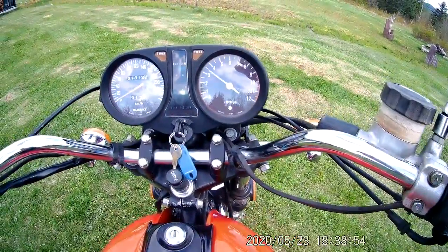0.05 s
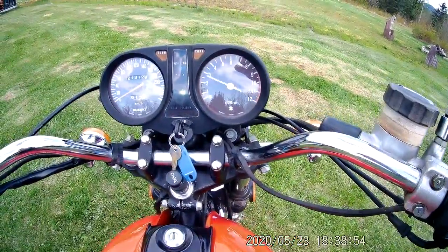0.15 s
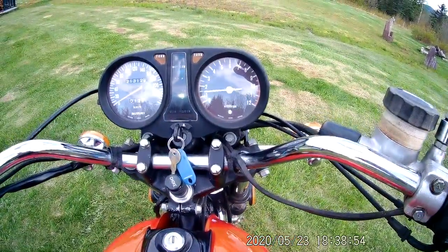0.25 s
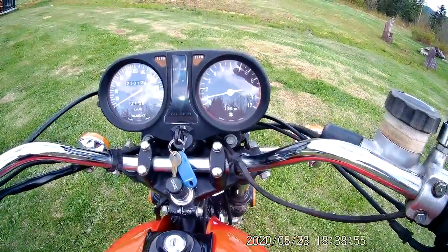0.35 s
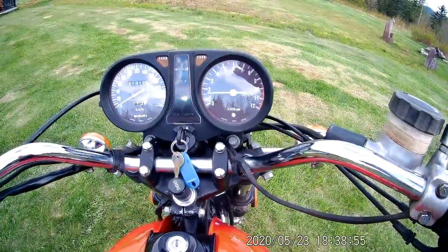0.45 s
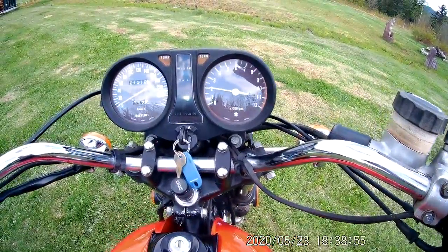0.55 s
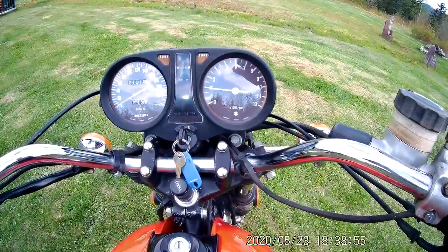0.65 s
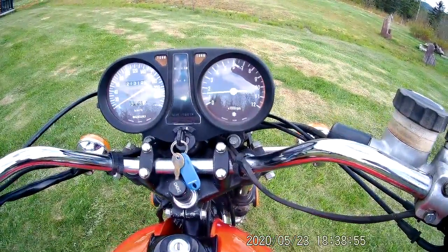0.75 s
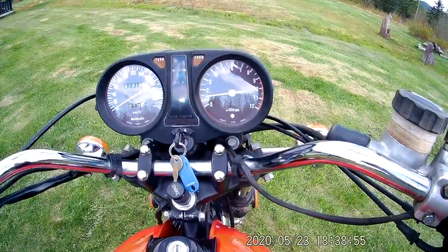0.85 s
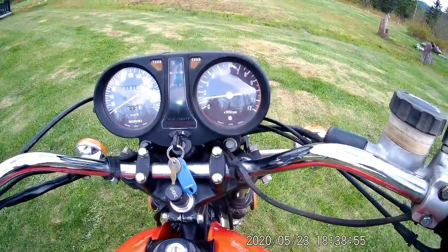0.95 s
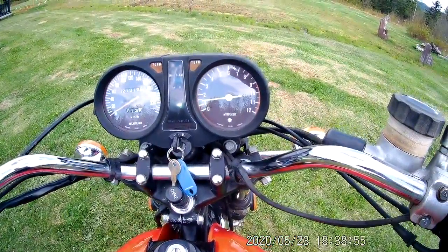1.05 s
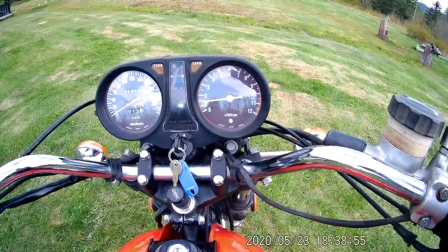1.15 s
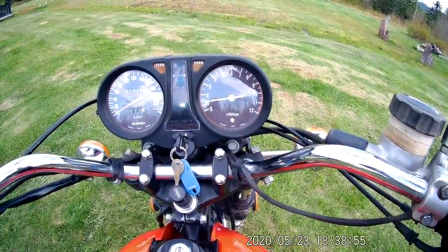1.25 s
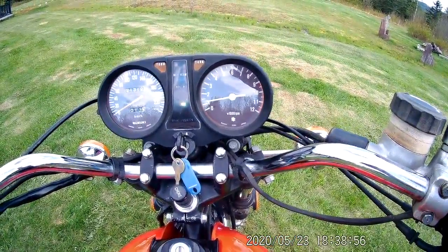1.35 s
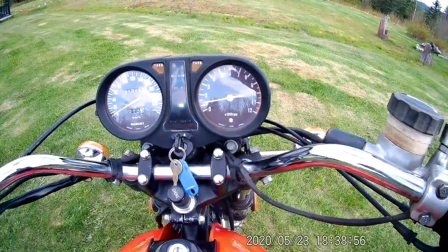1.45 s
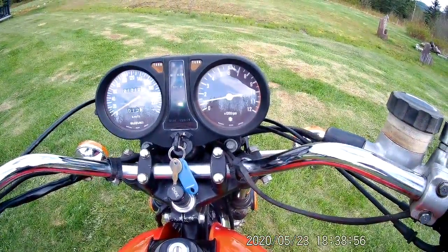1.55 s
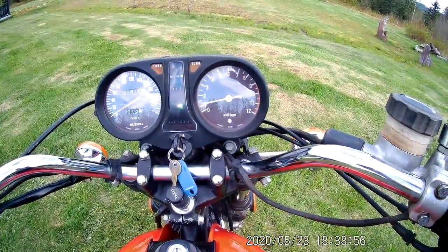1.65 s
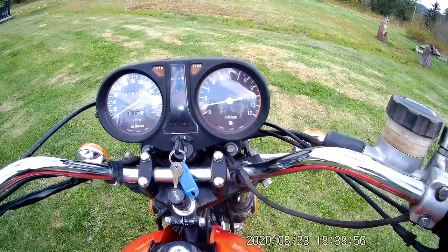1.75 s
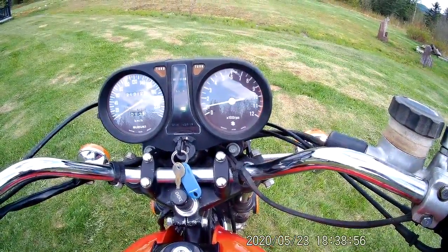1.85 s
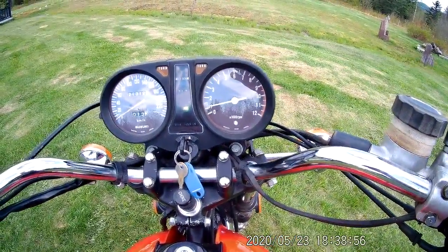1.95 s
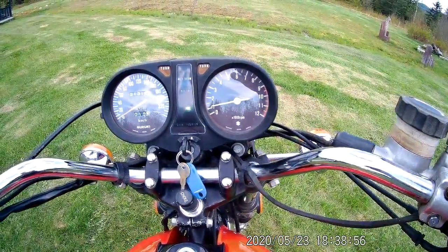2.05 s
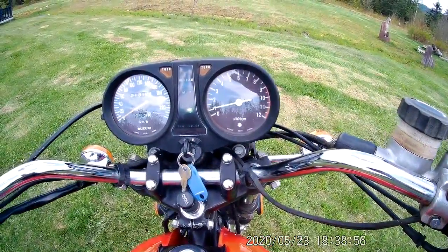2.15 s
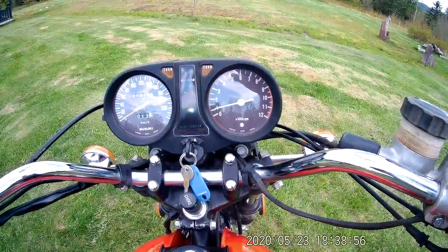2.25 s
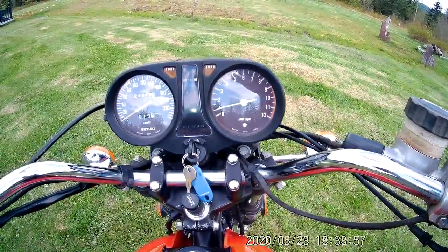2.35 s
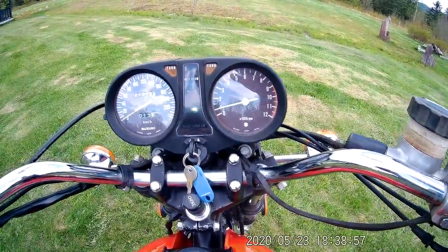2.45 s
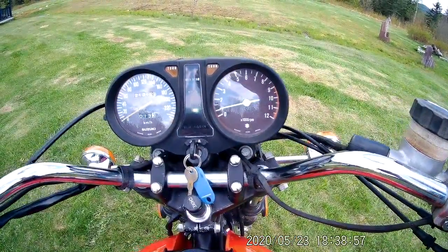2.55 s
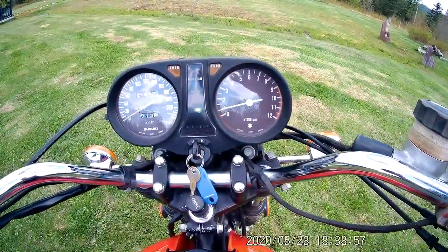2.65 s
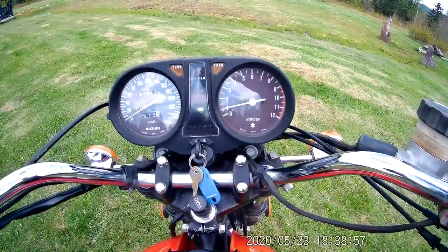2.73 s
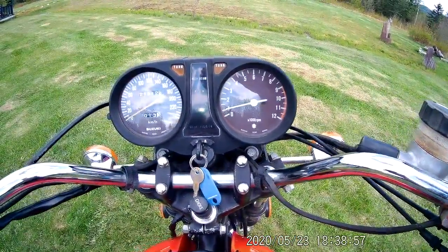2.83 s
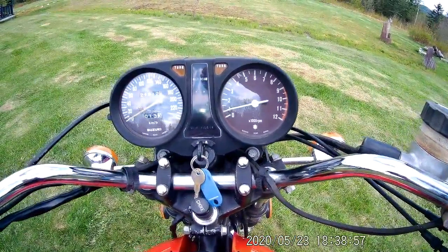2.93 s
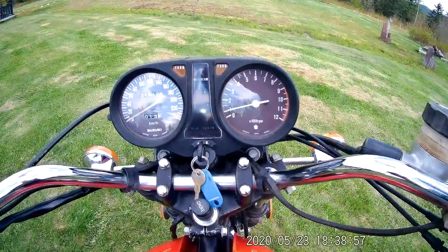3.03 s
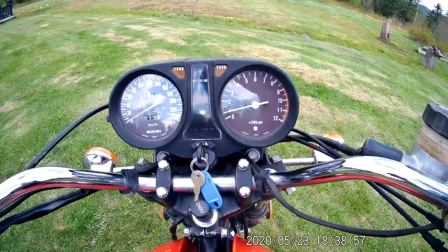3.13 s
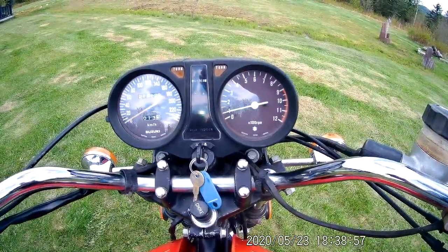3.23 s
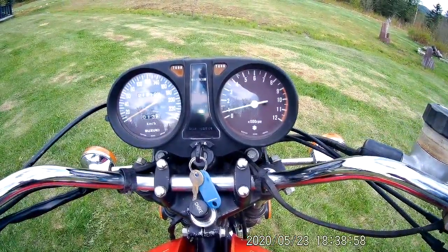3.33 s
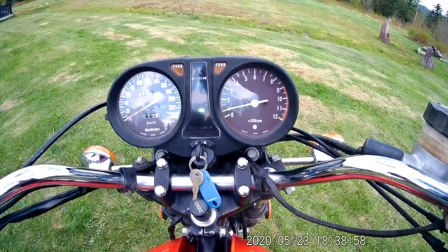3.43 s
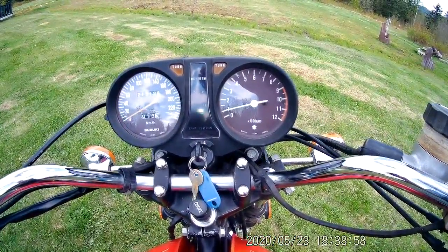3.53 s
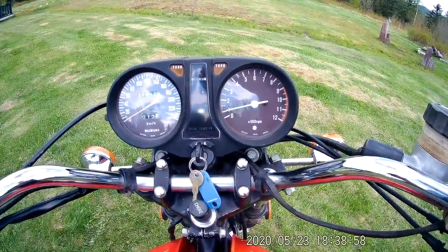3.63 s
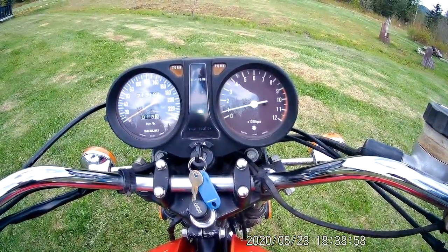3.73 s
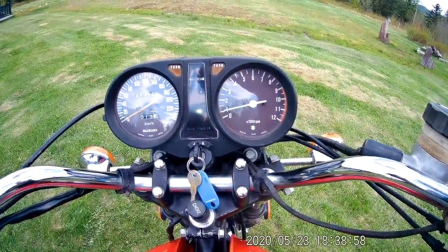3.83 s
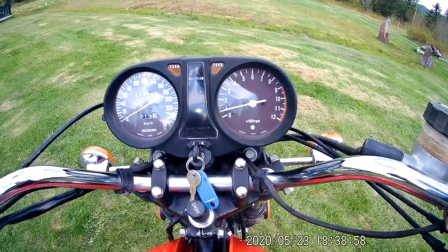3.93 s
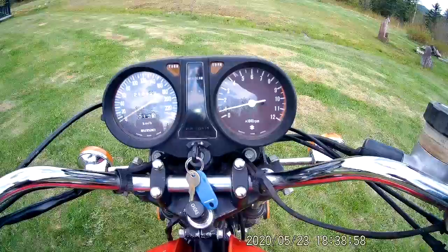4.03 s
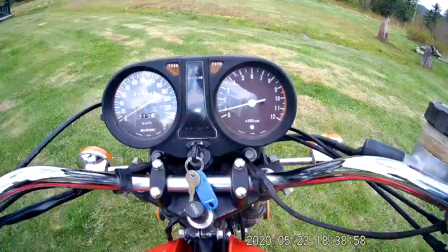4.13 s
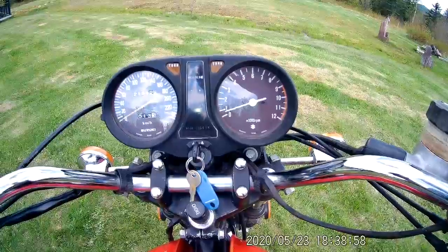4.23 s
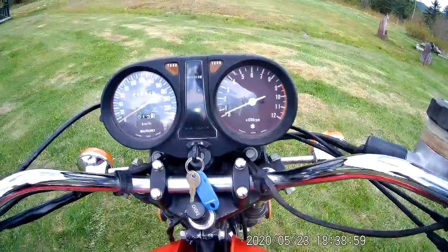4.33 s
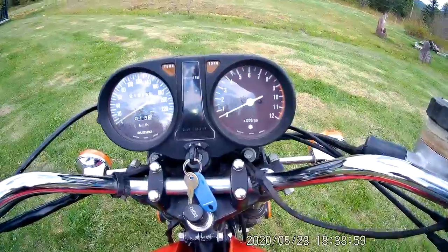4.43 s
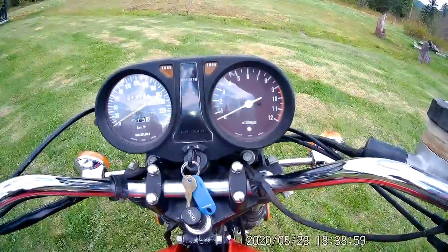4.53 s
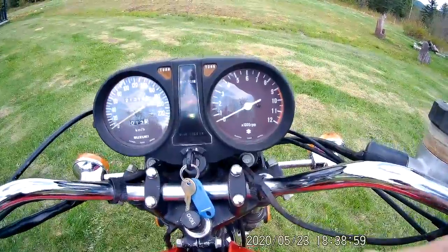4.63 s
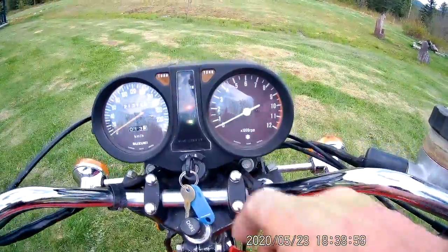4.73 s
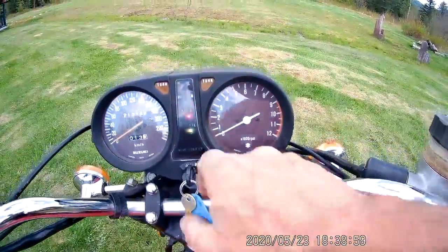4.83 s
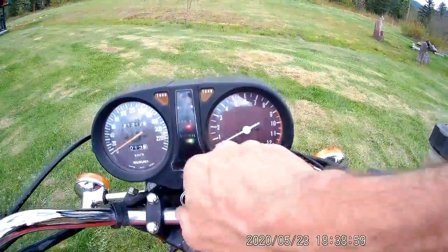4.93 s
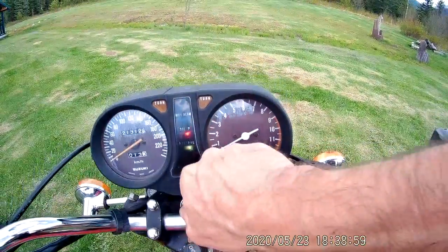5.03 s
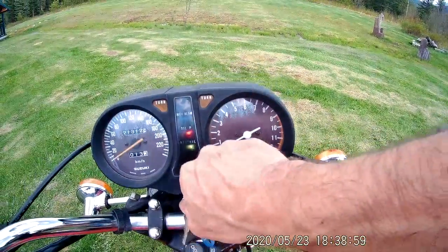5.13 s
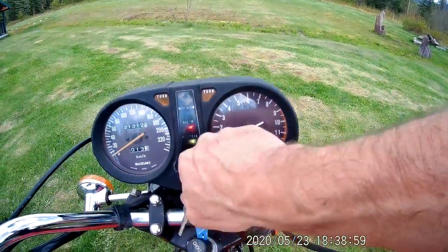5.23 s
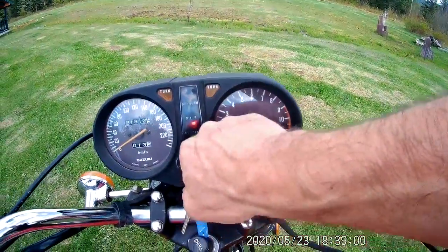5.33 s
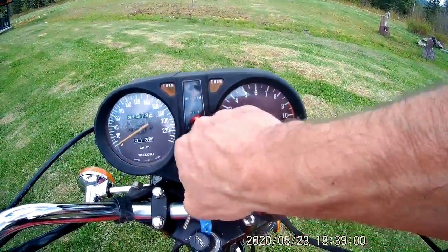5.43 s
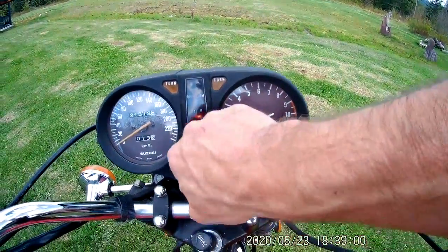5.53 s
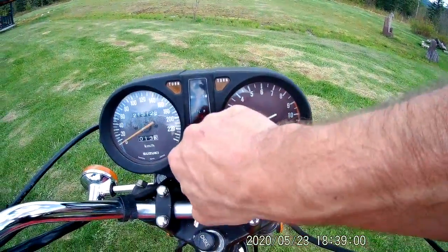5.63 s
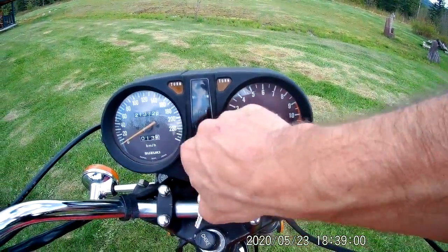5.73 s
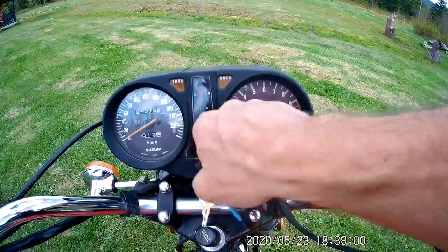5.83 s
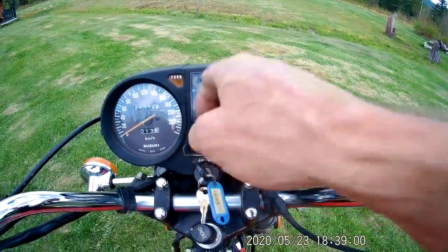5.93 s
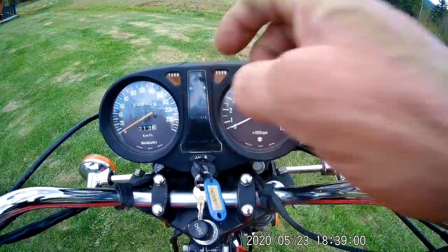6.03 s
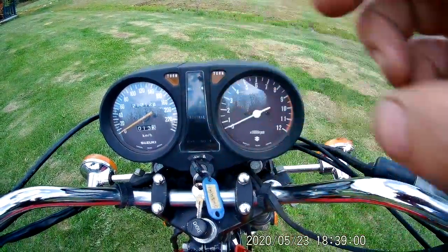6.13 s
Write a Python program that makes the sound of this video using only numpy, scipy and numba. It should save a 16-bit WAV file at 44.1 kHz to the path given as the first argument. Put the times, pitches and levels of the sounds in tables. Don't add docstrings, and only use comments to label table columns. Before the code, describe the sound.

A motorcycle engine falls from a short rev to a rattling idle, is switched off with a snap and clunks, then a key clicks and jingles.

```python
import sys
import numpy as np
from scipy import signal
from scipy.fft import rfft, irfft, next_fast_len
from scipy.io import wavfile
from scipy.ndimage import uniform_filter1d
from numba import njit

SR = 44100
rng = np.random.default_rng(int(sys.argv[2]) if len(sys.argv) > 2 else 0)


def digitize_waveform(pressure):
    field = np.atleast_2d(pressure).T
    bounded = np.clip(field, -1, 1)
    quanta = np.round(bounded * 32767).astype(np.int16)
    wavfile.write(sys.argv[1], SR, quanta)


def voltage_ratio(level):
    return 10 ** (np.asarray(level, float) / 20)


N = 272582
TIME = np.arange(N) / SR
CUT_S = 4.06
IDLE_HZ, BLIP_HZ = 43.8, 110
TEETH_PER_FIRING = 7.5


def unit(x, until=1.8):
    return x / np.sqrt(np.mean(x[:int(until * SR)] ** 2))


def steady(x, span_s):
    power = uniform_filter1d(x ** 2, int(span_s * SR))
    return x / np.sqrt(power + 1e-4 * np.mean(x ** 2))


@njit
def svf(x, hz, width):
    y, b, l = np.empty(len(x)), 0., 0.
    g, k = np.tan(np.pi * hz / SR), width / hz
    for i in range(len(x)):
        v = (b + g * (x[i] + 1e-18 - l)) / (1 + g * (g + k))
        b, l, y[i] = 2 * v - b, l + 2 * g * v, k * v
    return y


def ring(x, modes):
    out = 0
    for k, (hz, width, db) in enumerate(modes):
        out = out + (-1) ** k * voltage_ratio(db) * svf(x, float(hz), float(width))
    return out


def colour(x, points):
    hz, db = np.transpose(points)
    size = next_fast_len(N)
    bins = np.log(np.arange(size // 2 + 1) * SR / size + 1)
    gain = voltage_ratio(np.interp(bins, np.log(hz), db, left=-90, right=-90))
    return irfft(rfft(x, size) * gain, size)[:N]


def answer(hz, points):
    points_hz, db = np.transpose(points)
    return np.interp(np.log(hz), np.log(points_hz), db)


def walk(rate):
    k = int(SR / rate)
    held = np.repeat(rng.standard_normal(N // k + 1), k)
    return 1.31 * uniform_filter1d(uniform_filter1d(held, k), k)[:N]


def burst(s, db, t60):
    t = TIME - s
    decay = np.exp(-np.log(1000) * np.maximum(t, 0) / max(t60, .003))
    return voltage_ratio(db) * (t >= 0) * decay * rng.standard_normal(N)


def bell(s, hz, db, t60):
    t = np.maximum(TIME - s, 0)
    return voltage_ratio(db) * np.exp(-np.log(1000) * t / t60) * np.sin(2 * np.pi * hz * t)


def bump(at_s, width_s):
    return np.exp(-((TIME - at_s) / width_s) ** 2)


# loss in dB per s, loss in dB per s squared.
LAYER_LOSS = dict(tone=(40, 40), octave=(37, 40), uneven=(2.3, 104), chain=(73, 200), clatter=(4, 71.5),
              air=(31, 0), boom=(0, -26), jangle=(5, 0))


def fade(layer):
    since = np.clip(TIME - CUT_S, 0, 1)
    linear, square = LAYER_LOSS[layer]
    return -linear * since - square * since ** 2


# time in seconds, firing rate in Hz.
FIRING_RATE = [(0, 109.9), (.15, 96), (.3, 84.3), (.45, 77.5), (.6, 72.4), (.75, 68), (.9, 62.3),
               (1.05, 58.3), (1.2, 55.8), (1.35, 52.8), (1.65, 49.2), (1.9, 48.5), (2.25, 44.9),
               (2.55, 44.5), (2.7, 45.1), (3.0, 44.4), (3.17, 42.2), (3.45, 44.5)]


def crank():
    hz = np.interp(TIME, *np.transpose(FIRING_RATE + [(3.8, IDLE_HZ)]))
    hz = uniform_filter1d(hz, size=4000, mode="nearest")
    rev = np.clip((hz - IDLE_HZ) / (BLIP_HZ - IDLE_HZ), 0, 1)
    sag_hz_per_s = 32
    return np.maximum(hz - sag_hz_per_s * np.maximum(TIME - CUT_S, 0), 10), rev


# frequency in Hz, level in dB per Hz.
FLOOR_SPECTRUM = [(12, -35.5), (20, 1.5), (122, -3.5), (479, -14), (599, -15.5), (708, -17.5), (1080, -21),
                  (1240, -23), (1830, -24.5), (3100, -28.5), (6950, -30), (8450, -29.5), (10300, -30),
                  (12000, -22.5), (13200, -26.5), (15600, -28)]


def camera(rev):
    hiss = unit(colour(rng.standard_normal(N), FLOOR_SPECTRUM)) * voltage_ratio(-62)
    whistle = voltage_ratio(-83 + 1.0 * walk(7.4)) * np.sin(2 * np.pi * 8613 * TIME)
    whistle = whistle + voltage_ratio(-85 + 2.5 * walk(9)) * np.sin(2 * np.pi * 12306 * TIME)
    hold_s, release_s = 4.585, 0.47
    lift_db = 10.5 * rev + 9.5 * np.clip(1 + (hold_s - TIME) / release_s, 0, 1)
    return (hiss + whistle) * voltage_ratio(lift_db)


# start in seconds, peak in dB, bright part relative to the peak in dB, ring in seconds.
LOCK_CLICKS = [(5.174, -52, -6, 0.024), (5.188, -54, -6, 0.022), (5.1965, -54, 2, 0.01),
               (5.204, -54, -5, .02), (5.22, -54, -12, .01), (5.260, -59, 1.5, 0.073),
               (5.540, -61, -8, 0.028), (5.547, -51, -11, 0.038), (5.589, -52, -12, 0.032),
               (5.594, -48, -9, .02), (5.597, -36, 0, 0.018), (5.605, -49, -7, 0.046),
               (5.614, -53, -18, 0.17), (5.636, -41.5, 1, 0.013), (5.660, -56, -13.5, .04),
               (5.732, -62.5, -0.5, 0.023), (5.858, -60, -9, .02), (5.9595, -48, -4, 0.012)]
# frequency in Hz, width in Hz, level in dB.
LOCK_MODES = [(313, 29, -5), (595, 73, -1.5), (1150, 160, 4), (1655, 300, 2), (1910, 190, 0),
              (2500, 250, -13)]
# frequency in Hz, width in Hz, level in dB.
PIN_MODES = [(3620, 540, 4), (4560, 1100, -1.5), (5870, 2150, -7), (7360, 1100, -2), (7930, 840, -2.5)]
# start in seconds, frequency in Hz, level in dB, ring in seconds.
KEY_PARTIALS = [(5.262, 8170, -54, 0.08), (5.27, 8170, -55, .07), (5.278, 8170, -54.5, 0.043),
                (5.277, 10100, -60, 0.11), (5.265, 12000, -59, .08), (5.268, 3770, -61, .03),
                (5.614, 8060, -43, 0.038), (5.636, 5700, -44, .012), (5.547, 640, -57, .04),
                (5.73, 7940, -72, .08)]
# start in seconds, frequency in Hz, level in dB, ring in seconds.
BARREL_PARTIALS = [(5.5985, 1109, -29, .035), (5.599, 630, -38, .05), (5.599, 323, -46, .05),
                   (5.5995, 1766, -35, .02), (5.6365, 1150, -41, .022), (5.549, 680, -54, .04),
                   (5.9595, 1600, -46, .018), (5.9595, 3530, -52, .012), (5.964, 1017, -58, .06),
                   (5.1965, 8300, -49, .008), (5.1965, 12800, -54, .006)]


def key():
    knock = sum(burst(s + 0.0007, db, t60) for s, db, _, t60 in LOCK_CLICKS)
    for s, db, _, _ in LOCK_CLICKS:
        knock[int((s + .0005) * SR)] += voltage_ratio(db + 15.5)
    tick = sum(burst(s, db + bright_db, 0.96 * t60) for s, db, bright_db, t60 in LOCK_CLICKS)
    jingle = sum(bell(*row) for row in KEY_PARTIALS + BARREL_PARTIALS)
    return voltage_ratio(10.5) * ring(knock, LOCK_MODES) + voltage_ratio(12.5) * ring(tick, PIN_MODES) + jingle


# frequency in Hz, width in Hz, level in dB.
CASING_MODES = [(224, 10, -22), (310.9, 14.4, -1), (377, 29, -10.5), (529.7, 46, -3.5), (620.3, 22.3, -8),
                (715.4, 24, -4), (919.3, 25.6, -10), (1024, 34, -3), (1151, 41.5, -8), (1262, 27, -1.5),
                (1504.5, 29.7, -3), (1697, 15.3, -3.5), (1808, 99, -21), (2122, 11, -8), (2484, 56, -24.5),
                (2592, 22, -22.5)]


def casing_ring(blows):
    return ring(blows, CASING_MODES)


# frequency in Hz, level in dB per Hz.
CASING_COLOUR = [(76, -36), (130, -10), (238, -6.5), (360, -2.5), (429, -9), (531, -8.5), (805, -5),
                 (1510, -6.5), (2000, -12), (3200, -48.5), (4160, -77.5), (7040, -120)]


def casing_colour(blows):
    return colour(blows, CASING_COLOUR)


# start in seconds, peak in dB, ring in seconds.
SWITCH_CLICK = [
    (4.0628, -18.5, 0.009),
]
# start in seconds, frequency in Hz, level in dB, ring in seconds.
SWITCH_PARTIALS = [(4.0627, 1550, -9, .012), (4.0627, 2900, -22, .005), (4.0627, 4200, -20, 0.006),
                   (4.0627, 9300, -14.5, 0.009), (4.0627, 13560, -18, .006), (4.0627, 11600, -19.5, 0.005),
                   (4.0627, 6400, -18, 0.005)]
# start in seconds, peak in dB, ring in seconds.
CRANK_CLUNKS = [
    (4.451, -27, 0.12),
    (4.496, -24, 0.17),
    (4.518, -29, 0.087),
    (4.542, -20.5, 0.16),
]
# start in seconds, frequency in Hz, level in dB, ring in seconds.
CLUNK_PARTIALS = [(4.542, 1513, -21, 0.095), (4.5415, 2490, -27, 0.062), (4.545, 1700, -38, 0.22),
                  (4.548, 501, -26.5, 0.1), (4.546, 940, -29, 0.12), (4.547, 382, -31.5, 0.18),
                  (4.55, 1513, -26, 0.075)]
# start in seconds, frequency in Hz, level in dB, ring in seconds.
GAS_BOOMS = [
    (4.15, 99.3, -13, .45),
    (4.17, 140, -23, .35),
    (4.341, 99.4, -22, .2),
    (4.35, 140, -29, .25),
]


def stop():
    snap = sum(burst(*row) for row in SWITCH_CLICK)
    blows = sum(burst(*row) for row in CRANK_CLUNKS)
    last_s, last_db, last_t60 = CRANK_CLUNKS[-1]
    crack = burst(last_s, last_db, 0.3 * last_t60)
    noise = rng.standard_normal(N)
    body = casing_ring(blows) / np.std(casing_ring(noise))
    body = body + voltage_ratio(1.0) * casing_colour(blows) / np.std(casing_colour(noise))
    partials = sum(bell(*row) for row in GAS_BOOMS + CLUNK_PARTIALS + SWITCH_PARTIALS)
    bright = partials + voltage_ratio(-2.5) * svf(svf(crack, 3700.0, 1600.0), 3700.0, 1600.0)
    away = svf(svf(burst(4.5, -23.0, 0.71), 140.0, 160.0), 142.0, 160.0)
    return voltage_ratio(-0.5) * svf(snap, 6300.0, 11000.) + voltage_ratio(-8.5) * body + bright + away


# start in seconds, peak in dB, frequency in Hz.
CRANK_KNOCKS = [(0.504, -13.5, 586), (0.627, -19, 622), (0.888, -12.5, 530), (0.953, -14, 589),
                (0.997, -26, 541), (1.042, -21, 546), (1.168, -9, 600), (1.238, -31, 595),
                (1.276, -19, 528), (1.316, -9, 544), (1.392, -12.5, 540), (1.511, -23, 606),
                (1.711, -11.5, 526), (1.751, -17.5, 614), (1.918, -9.5, 541), (1.961, -16, 608),
                (1.999, -20, 538), (2.081, -12, 552), (2.123, -9, 522), (2.258, -24.5, 554),
                (2.438, -10.5, 530), (2.484, -7.5, 540), (2.739, -28, 603), (2.93, -19, 604),
                (3.019, -13, 536), (3.1, -22.5, 633), (3.159, -6, 541), (3.207, -18, 526),
                (3.391, -12.5, 520), (3.705, -20, 533)]
# start in seconds, peak in dB, frequency in Hz.
COVER_PINGS = [(0.166, -17, 1500), (0.5467, -15, 1500), (0.6374, -15, 1520), (0.6719, -17.5, 1530),
               (0.6978, -16, 1390), (0.7557, -15, 1490), (0.8624, -14, 1520), (0.9702, -16, 1370),
               (1.0954, -18, 1710), (1.1368, -17, 1520), (1.257, -16, 1490), (1.4481, -17, 1510),
               (1.6297, -17, 1500), (1.6873, -13.5, 1530), (1.957, -17, 1510), (2.1236, -16, 1500),
               (2.2124, -15, 1510), (2.2772, -12, 1510), (2.3905, -16, 1500), (2.5456, -18, 1500),
               (2.6214, -19, 1420), (2.6589, -16.5, 1510), (2.7731, -14, 1530), (2.7965, -13, 1520),
               (3.0215, -15, 1500), (3.0814, -13.5, 1520), (3.2345, -19.5, 1530), (3.274, -15, 1510),
               (3.3662, -15, 1525), (3.4176, -16.5, 1510), (3.6875, -16.5, 1320), (3.7314, -16, 1500),
               (3.896, -15, 1530), (3.959, -14.5, 1480), (4.0302, -16, 1390), (4.0522, -14, 1504),
               (4.0786, -15.5, 1480), (4.1545, -20, 1510), (4.2128, -15.5, 1520), (4.2936, -20, 1640)]


def knocks():
    dull = sum(bell(s - .002, hz, db, .045) for s, db, hz in CRANK_KNOCKS)
    pings = sum(bell(s, hz, db, .05) for s, db, hz in COVER_PINGS)
    return voltage_ratio(-2) * svf(dull, 650.0, 400.) + voltage_ratio(-3) * svf(pings, 1520., 400.)


def gear(hz):
    level_db = -20.5 - 2.5 * bump(0.21, 0.14) + fade("clatter")
    level_db = level_db - 8 * np.clip((TIME - 4.39) / 0.042, 0, 1)
    air_db = -16.5 + 3.5 * bump(1.0, 0.84) + np.maximum(fade("air"), -11)
    boom_db = np.minimum(fade("boom"), 6)
    jangle_db = 2.5 + 4.5 * np.clip((hz - 53.4) / 8, 0, 1) + np.maximum(fade("jangle"), -4)
    return level_db, air_db, boom_db, jangle_db


# firings between blows, place in the cycle 0-1, frequency in Hz, width in Hz,
# level over the clatter in dB, scatter in dB.
LOOSE_PARTS = [
    (4, .14, 1780, 240, -17.5, 2),
    (2, .75, 560, 60, -12, 4),
]


def slack(firings, level_db):
    out = 0
    for every, place, hz, width, db, scatter_db in LOOSE_PARTS:
        count = np.floor(firings / every + place).astype(int)
        at = np.flatnonzero(np.diff(count)) + 1
        blows = np.zeros(N)
        blows[at] = voltage_ratio(scatter_db * rng.uniform(-1, 1, N // 100)[count[at]])
        hz, width = float(hz), float(width)
        rung = svf(svf(svf(blows, hz, 2 * width), hz, 2 * width), hz, width)
        out = out + voltage_ratio(db) * unit(rung)
    return voltage_ratio(level_db) * out


# frequency in Hz, level in dB per Hz.
AIR_SPECTRUM = [(1530, -37), (2600, -4.5), (3390, -10.5), (3890, -1.5), (4170, 0), (6050, -14.5),
                (7150, -6.5), (8980, -7.5), (9690, -8), (12400, -8.5), (13400, -14), (15100, -17),
                (16000, -29.5)]
# frequency in Hz, width in Hz, level in dB.
FIN_MODES = [(3930, 93, -4), (4023, 77, -5), (4346, 55, -4.5), (4696, 90, -11), (7330, 78, -11.5),
             (8400, 150, -13.5), (9126, 96, -8)]


def clatter(firings, level_db, air_db, low_db, jangle_db):
    beat = np.exp(-((firings - .55) % 1) / .45)
    scatter_db = 3.0 * np.clip(rng.standard_normal(N // 50), -2, 1.2)
    beat = beat * voltage_ratio(scatter_db[(firings - .55).astype(int)])
    rattle = rng.standard_normal(N) * (.5 + 1.3 * uniform_filter1d(beat, size=120))
    cycle = np.interp(firings / 4 % 1, np.linspace(0, 1, 161), rng.standard_normal(161))
    blows = steady(rattle, 0.14) + 0.11 * cycle
    metal = unit(casing_ring(blows)) + voltage_ratio(-4.5) * unit(casing_colour(blows))
    low = signal.sosfilt(signal.butter(2, 750, fs=SR, output="sos"), metal)
    jangle = (voltage_ratio(jangle_db) - 1) * svf(metal, 2900.0, 830.0)
    cover = (voltage_ratio(4.5 * bump(.5, 1.0)) - 1) * svf(metal, 1700., 50.)
    high = (metal - low + jangle + cover) / np.std((metal - low)[:SR * 4])
    noise = rng.standard_normal(N) * (1.0 + 0.33 * beat)
    puffs = sum(voltage_ratio(1.9 * walk(14)) * svf(noise, hz, hz * 0.92) for hz in 2800.0 * 1.5 ** np.arange(5))
    air = unit(colour(puffs, AIR_SPECTRUM)) + voltage_ratio(-3.5) * unit(ring(puffs, FIN_MODES))
    return voltage_ratio(level_db) * (high + voltage_ratio(low_db - 3.5) * unit(low) + voltage_ratio(air_db) * unit(air))


def tank(firings, hz):
    tank_hz, width_hz = 204, 43
    hum = 0
    for order in (3, 5):
        near = np.exp(-((order * hz - tank_hz) / width_hz) ** 2)
        hum = hum + near * np.sin(2 * np.pi * order * firings)
    return np.sqrt(2) * voltage_ratio(-39.5 + 2.5 * walk(6.5) + fade("tone")) * hum


# frequency in Hz, level in dB.
CHAIN_RESPONSE = [(290, -49), (318, -26), (340, -28), (392, -29), (410, -44), (450, -35), (520, -25),
                  (590, -31), (670, -56.5), (830, -62.5)]


def chain(firings, hz):
    whine_db = answer(TEETH_PER_FIRING * hz, CHAIN_RESPONSE) + fade("chain")
    turn = np.pi * (firings + .35)
    throb = 1 + 0.5 * np.sin(turn) + 0.29 * np.sin(turn / 2)
    slap_db, slap = 1.6 * walk(12), .25 * walk(25)
    return voltage_ratio(whine_db + 1.5 + slap_db) * throb * np.sin(2 * np.pi * TEETH_PER_FIRING * firings + slap)


# multiple of the firing rate, level at idle in dB, gain from a quarter of the blip up in dB.
ENGINE_ORDERS = [(1.25, -43.5, 6), (1.5, -44, 12), (1.75, -42.5, 5), (2.5, -35, -9), (2.75, -37, -9),
                 (3, -42, 4), (3.75, -38, -4), (5, -46, 0), (7, -42, -8), (7.25, -41, -9), (8, -43, -4),
                 (8.5, -45, 1)]


def orders(firings, rev):
    lines = 0
    for order, db, rev_db in ENGINE_ORDERS:
        level_db = db + rev_db * np.minimum(4 * rev, 1) + 2.5 * walk(6) + fade("tone")
        lines = lines + voltage_ratio(level_db) * np.sin(2 * np.pi * order * firings + 1)
    return np.sqrt(2) * lines


# time in seconds, peak in dB.
RICH_CHARGES = [(1.122, -8.5), (1.302, -11), (1.446, -13.5), (1.543, -11), (1.684, -13.5), (1.74, -11.5),
                (1.873, -12), (2.075, -9.5), (2.215, -14), (2.331, -8.5), (2.416, -12), (2.51, -12),
                (2.597, -13.5), (2.69, -12), (2.743, -13), (2.865, -12), (2.957, -9), (3.046, -10),
                (3.137, -11), (3.327, -16), (3.328, -10), (3.51, -11.5), (3.593, -11), (3.692, -12.5),
                (3.858, -12), (3.963, -9.5), (4.047, -13.5)]


def rich():
    mean_db, delay_s, width_s = -14, .016, .018
    swell = sum(.55 * max(db - mean_db, 0) * bump(s + delay_s, width_s) for s, db in RICH_CHARGES)
    return swell - 1.0


def lump(firings, rev):
    cycles = firings / 4 - .72
    share = rng.uniform(.3, 1.3, N // 100)[(cycles + .5).astype(int)]
    swell = share * np.exp(2.5 * (np.cos(2 * np.pi * cycles) - 1)) - .3
    return 5.5 * np.minimum(5 * rev, 4 * (1 - rev)).clip(0, 1) * swell


# frequency in Hz, level in dB.
PIPE_RESPONSE = [(36, -22), (45, -25.5), (60, -17.5), (78, -15.5), (92, -15.5), (110, -14), (122, -15),
                 (155, -26), (190, -34.5)]


def pipe_levels(firings, hz, rev):
    swell_db = 5 * bump(0, 0.11) + lump(firings, rev)
    rich_db = rich()
    tone_db = answer(hz, PIPE_RESPONSE) + swell_db + fade("tone")
    octave_db = answer(2 * hz, PIPE_RESPONSE) - 4 + swell_db + rich_db + fade("octave")
    uneven_db = -25 + 4 * rev + rich_db + fade("uneven")
    return tone_db, octave_db, uneven_db


# frequency in Hz, width in Hz, level in dB.
EXHAUST_MODES = [(93.5, 26, 2), (126, 24, -7), (38.5, 14, 2.5), (320, 30, -10), (160, 26, -13)]
CYLINDER_PUSH = [-.2, 0, 1.3, -.9]


def exhaust(firings, hz, rev):
    tone_db, octave_db, uneven_db = pipe_levels(firings, hz, rev)
    count = np.floor(firings).astype(int)
    at = np.flatnonzero(np.diff(count)) + 1
    pulses = np.zeros(N)
    scatter = 0.76 * rng.uniform(-1.6, 1, N // 100)
    pulses[at] = np.take(CYLINDER_PUSH, count[at], mode="wrap") + scatter[count[at]]
    soft = uniform_filter1d(uniform_filter1d(pulses, size=50), size=40)
    high_pass = signal.butter(4, 34, "high", fs=SR, output="sos")
    uneven = steady(signal.sosfilt(high_pass, ring(soft, EXHAUST_MODES)), 0.13)
    rumble = steady(svf(svf(rng.standard_normal(N), 104., 46.), 104., 46.), 0.45)
    turn, wobble_db = 2 * np.pi * firings, 1.3 * walk(22)
    lag = 2.3 + np.maximum(-3.5 * rev, -1.1)
    tones = voltage_ratio(tone_db) * np.sin(turn) + voltage_ratio(octave_db + wobble_db) * np.sin(2 * turn + lag)
    return np.sqrt(2) * tones + voltage_ratio(uneven_db) * (uneven + voltage_ratio(-4) * rumble)


def scene():
    hz, rev = crank()
    firings = 3.93 + np.cumsum(hz * (1 + .002 * walk(12))) / SR
    levels = gear(hz)
    pipes = exhaust(firings, hz, rev) + orders(firings, rev) + chain(firings, hz)
    running = np.clip((4.53 - TIME) / 0.11, 0, 1)
    engine = running * (pipes + tank(firings, hz) + (1 - rev) * slack(firings, levels[0]))
    engine = engine + clatter(firings, *levels)
    return (engine + knocks() + stop() + key() + camera(rev))[None]


# start in seconds, end in seconds.
DULL_SPANS = [
    (4.532, 4.562),
    (5.590, 5.650),
]


def dull_top(x):
    dull = signal.sosfiltfilt(signal.ellip(8, .1, 50, 8700, fs=SR, output="sos"), x)
    share = uniform_filter1d(sum(1. * (TIME > a) * (TIME < b) for a, b in DULL_SPANS), size=100)
    return x + share * (dull - x)


def band_limit(x):
    return signal.sosfilt(signal.butter(12, 15760, fs=SR, output="sos"), x)


def record(dry):
    rounded = np.tanh(0.88 * dry) / 0.87
    x = signal.sosfilt(signal.ellip(8, .2, 60, 15700, fs=SR, output="sos"), rounded)
    return band_limit(dull_top(x))


dry = scene()
out = record(dry)
digitize_waveform(out)
```